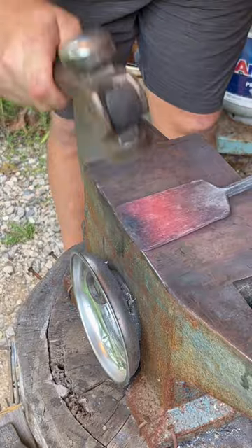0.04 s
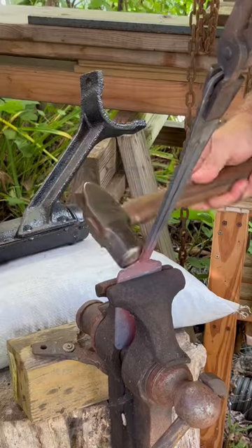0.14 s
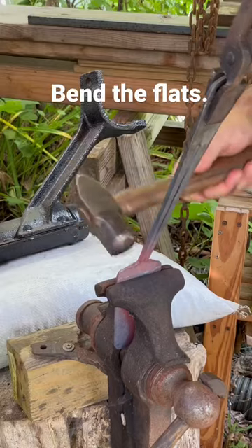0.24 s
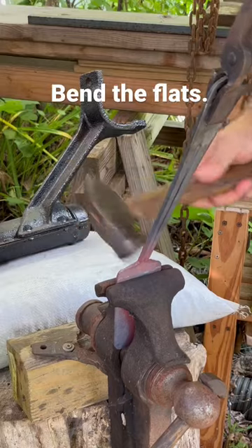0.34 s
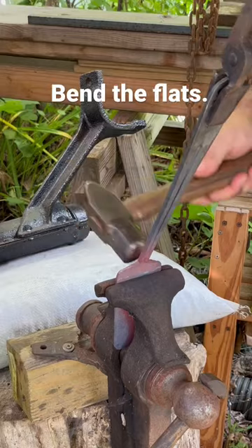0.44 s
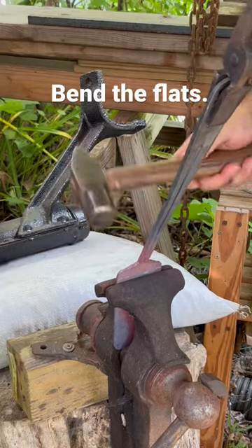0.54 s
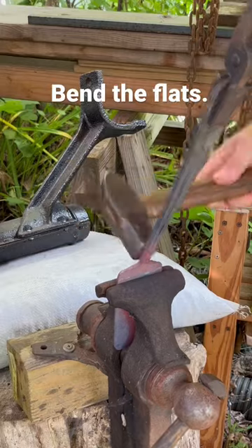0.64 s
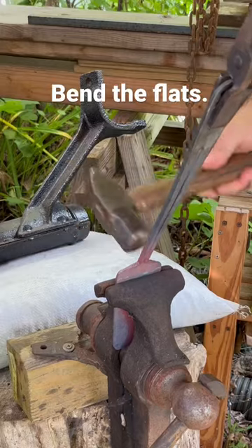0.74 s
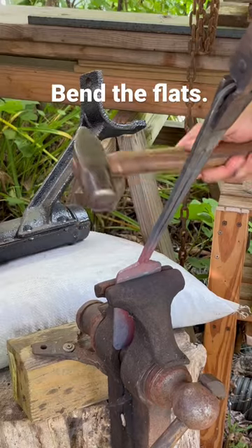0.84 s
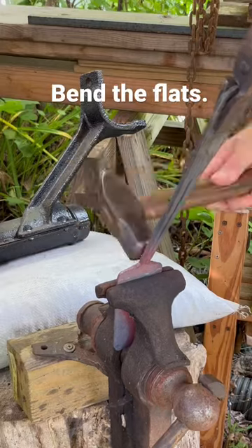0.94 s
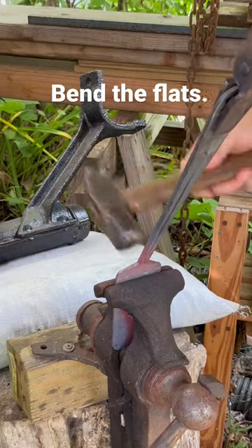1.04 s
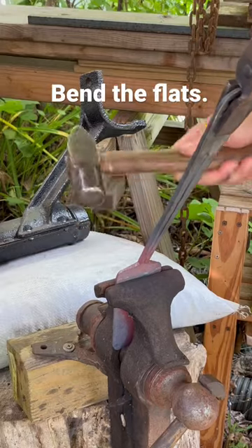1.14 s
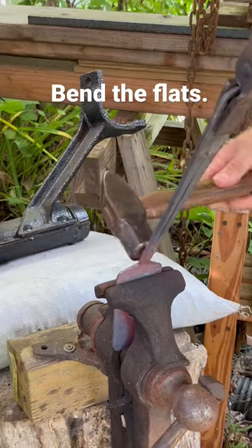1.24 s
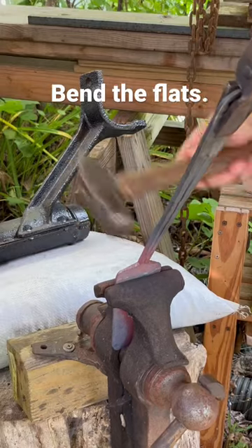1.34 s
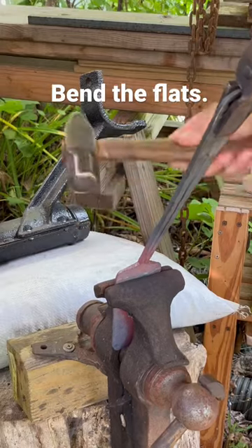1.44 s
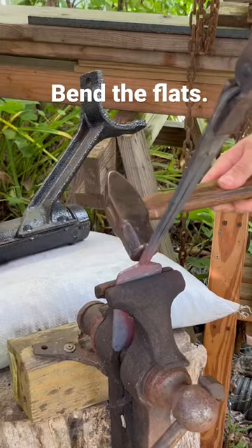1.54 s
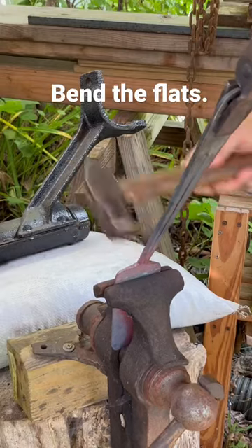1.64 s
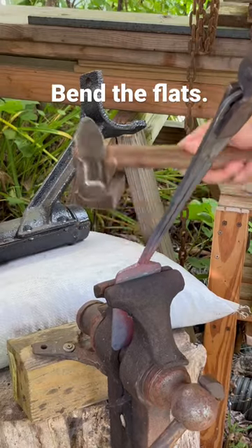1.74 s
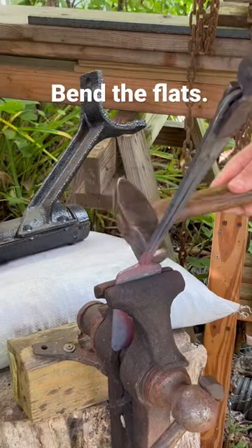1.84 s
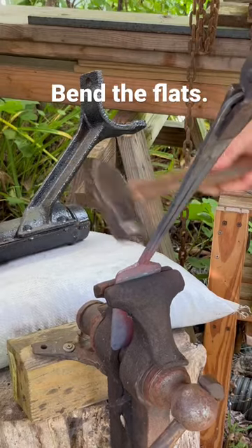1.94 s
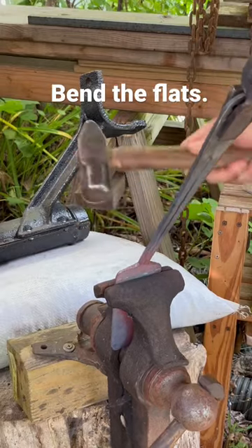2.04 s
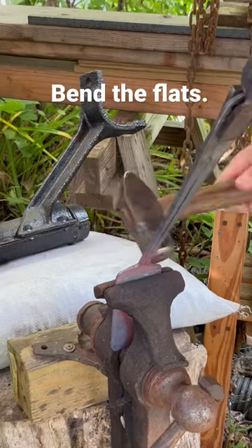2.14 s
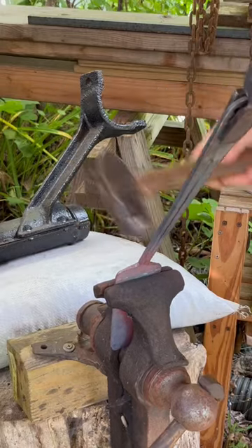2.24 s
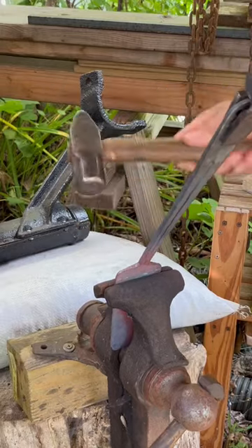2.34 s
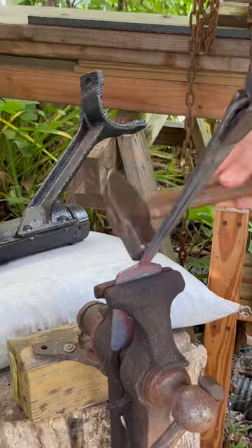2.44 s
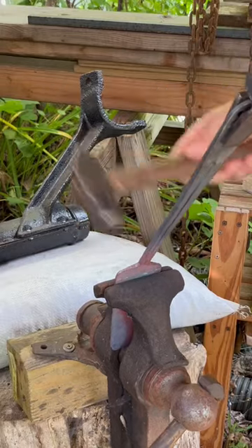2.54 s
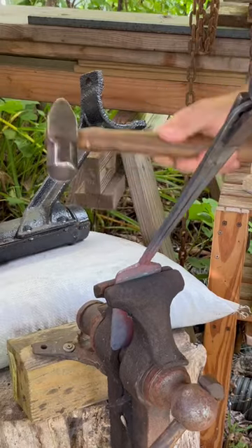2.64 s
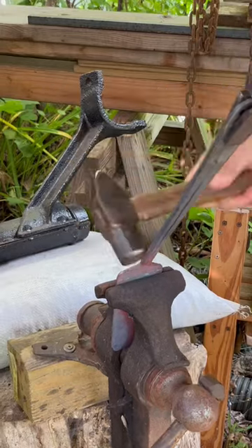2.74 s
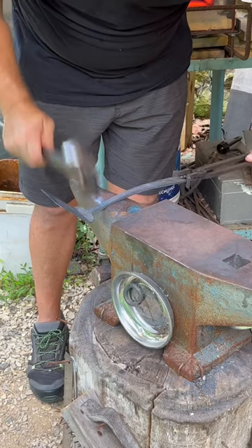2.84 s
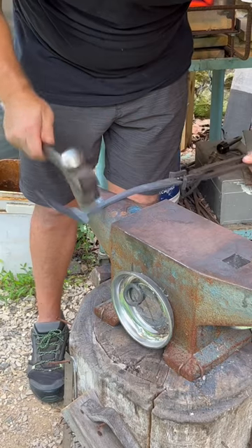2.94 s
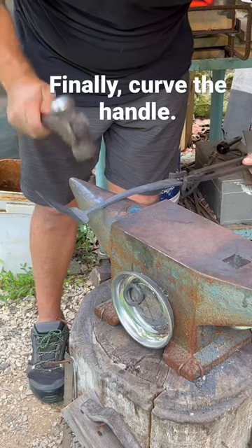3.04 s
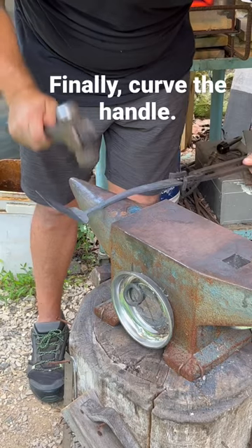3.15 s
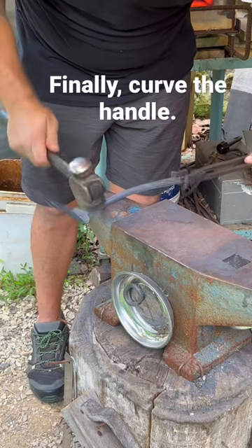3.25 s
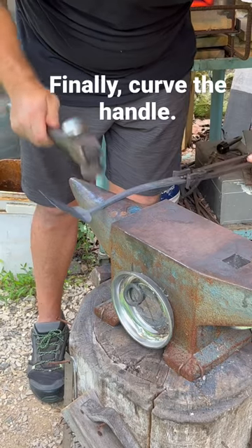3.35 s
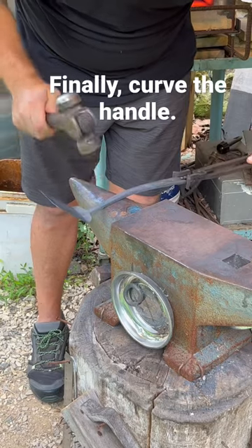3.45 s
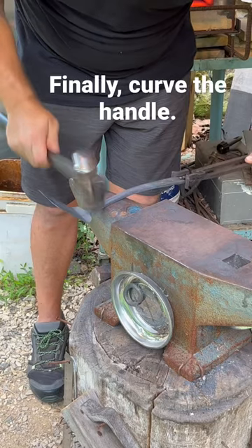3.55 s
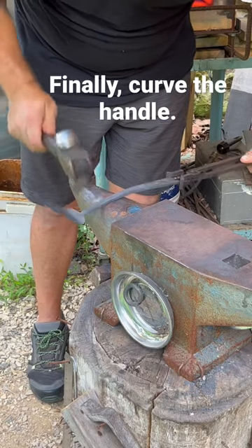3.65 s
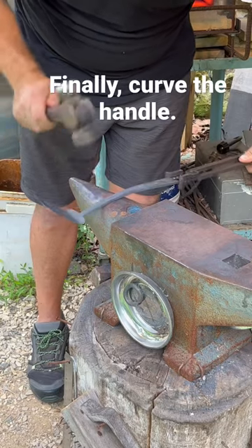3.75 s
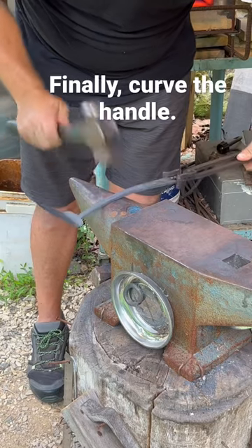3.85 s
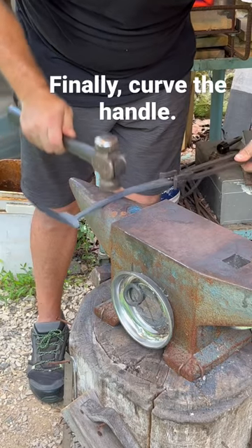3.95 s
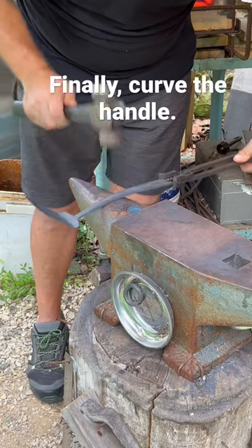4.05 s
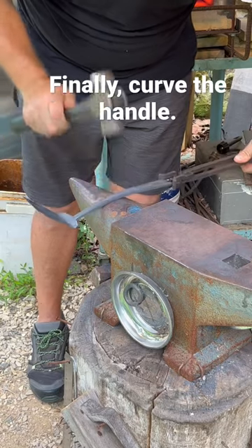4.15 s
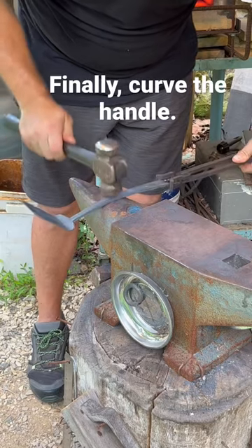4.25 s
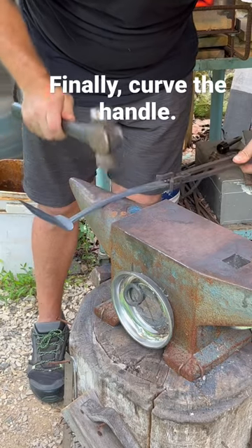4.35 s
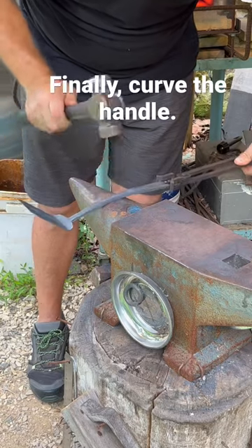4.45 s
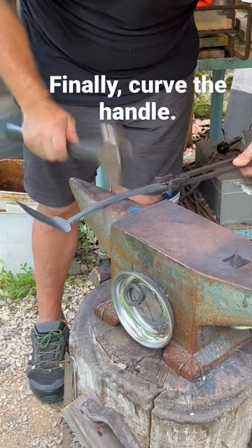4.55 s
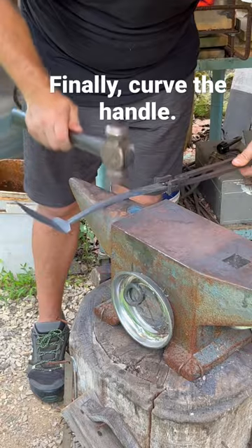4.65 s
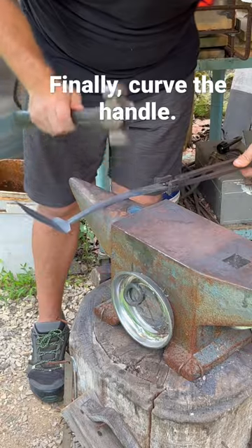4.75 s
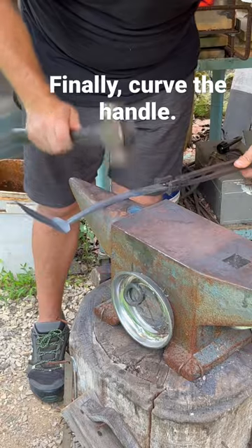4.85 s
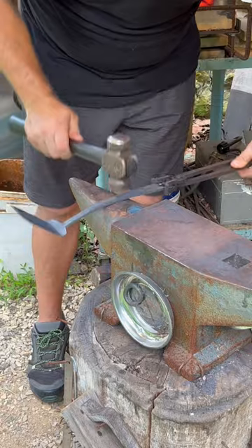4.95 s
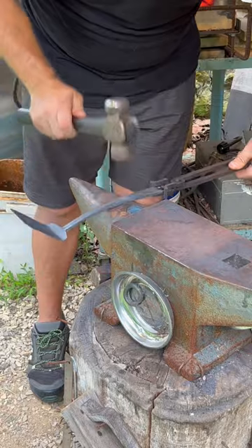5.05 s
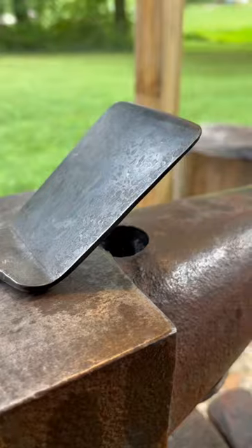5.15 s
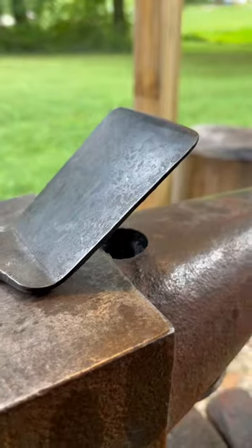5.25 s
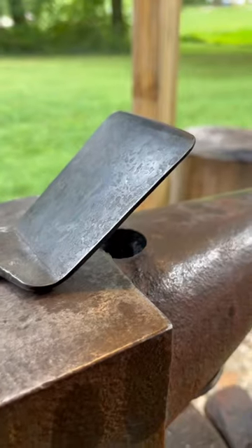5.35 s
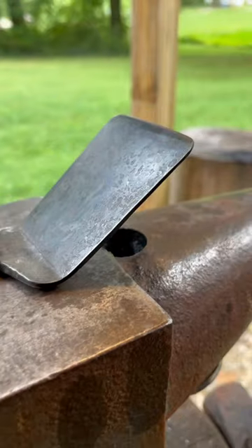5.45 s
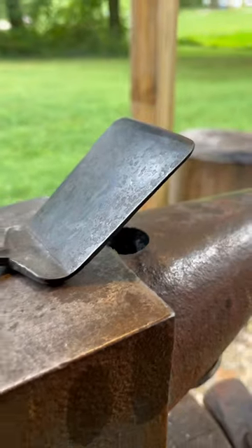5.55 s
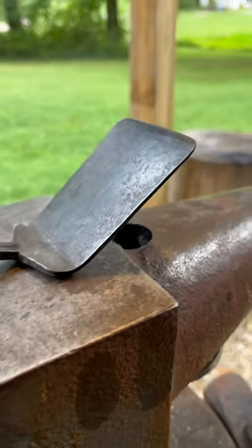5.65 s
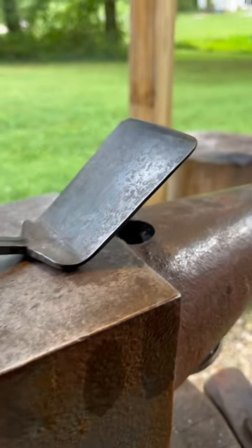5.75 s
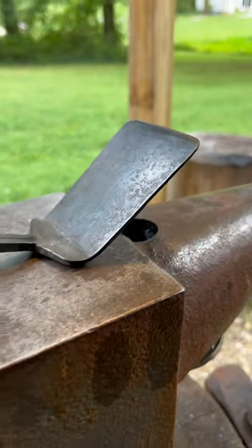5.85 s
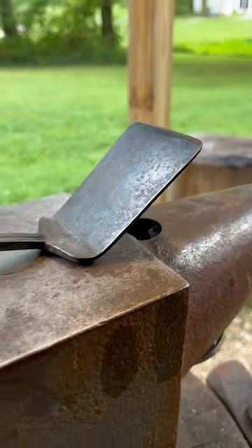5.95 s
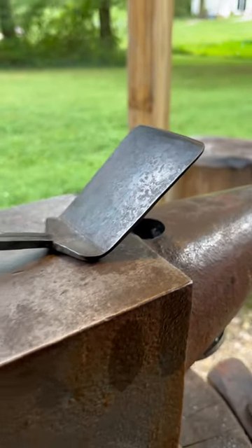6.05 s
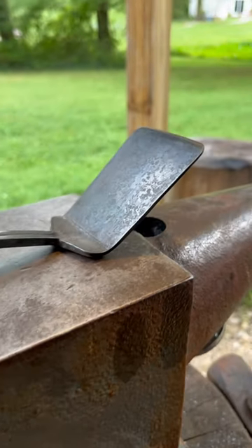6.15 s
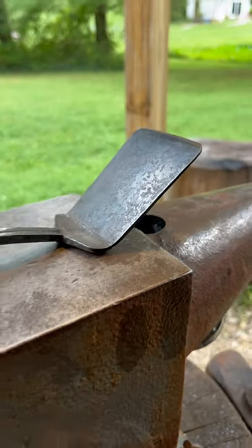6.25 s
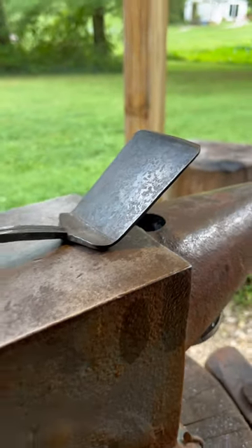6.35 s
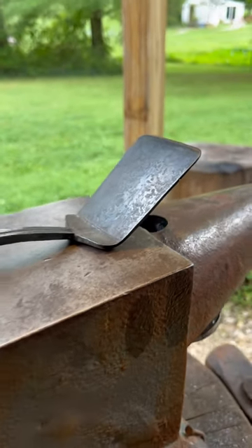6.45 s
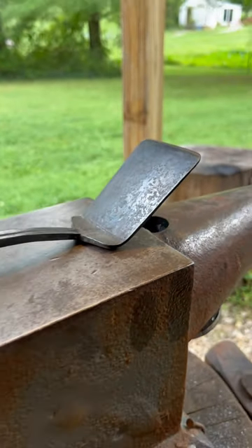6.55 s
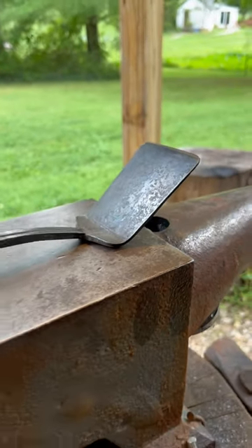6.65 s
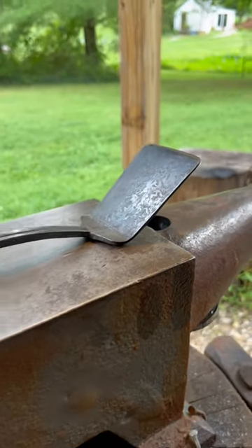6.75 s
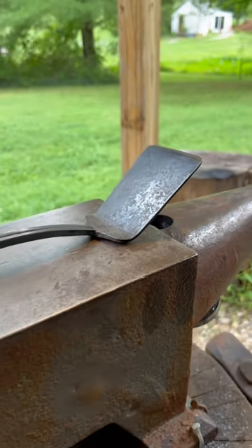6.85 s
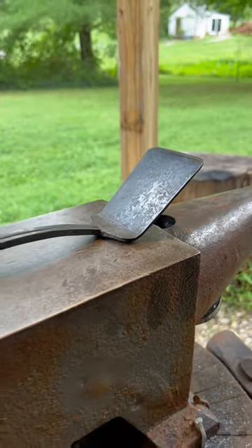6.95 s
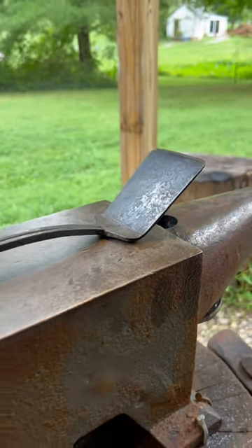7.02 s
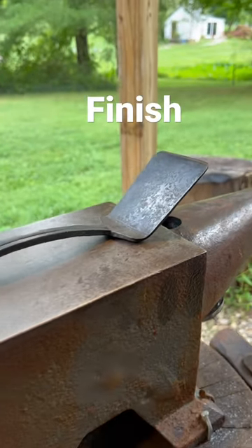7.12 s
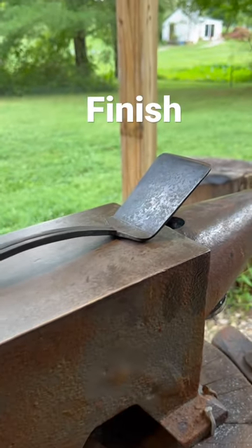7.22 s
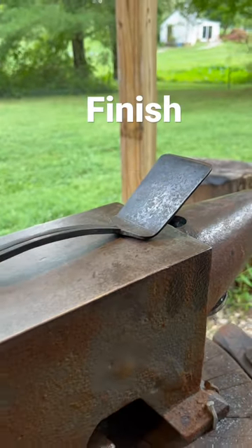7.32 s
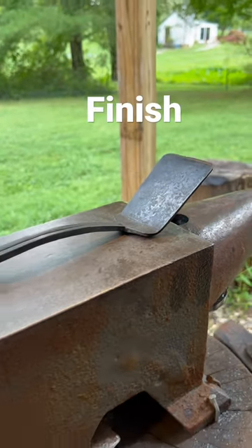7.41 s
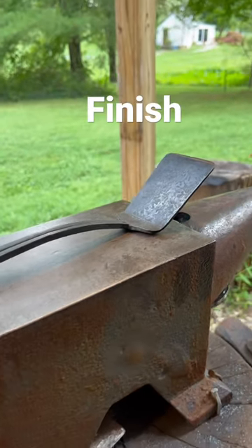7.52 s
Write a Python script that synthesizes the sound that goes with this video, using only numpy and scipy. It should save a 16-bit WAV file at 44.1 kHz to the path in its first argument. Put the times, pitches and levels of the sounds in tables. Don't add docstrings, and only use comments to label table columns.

```python
import sys
import numpy as np
from scipy import signal
from scipy.fft import rfft, irfft, next_fast_len
from scipy.io import wavfile
from scipy.ndimage import uniform_filter1d

SR = 44100
rng = np.random.default_rng(int(sys.argv[2]) if len(sys.argv) > 2 else 0)


def digitize_waveform(pressure):
    field = np.atleast_2d(pressure).T
    bounded = np.clip(field, -1, 1)
    quanta = np.round(bounded * 32767).astype(np.int16)
    wavfile.write(sys.argv[1], SR, quanta)


def voltage_ratio(level):
    return 10 ** (np.asarray(level, float) / 20)


N = 334263

CUTS_S = [
    .0944,
    2.8585,
    5.114,
]

# start_s, crack_db, rattle_under_crack_db,
# thud_under_crack_db, thud_hz
VISE_BLOWS = [(0.0909, -7.5, -19, -20.5, 624), (0.1118, -7, -9, 3.5, 272), (0.3764, -3.5, -15, -2, 290),
              (0.663, -2.5, -25.5, -10.5, 298), (0.9579, -4, -18, -16, 280),
              (1.2414, -8, -18.5, -33.5, 200), (1.5458, -5, -10, -7.5, 275),
              (1.8385, -1, -13.5, -19.5, 620), (2.138, -3.5, -16, -12, 610), (2.4377, -9, -16, -15.5, 525),
              (2.7417, -2.5, -23, -35, 543)]
# start_s, crack_db, rattle_under_crack_db, thud_under_crack_db
HORN_BLOWS = [
    (2.8833, -4, -9.5, -25),
    (3.2256, -7, -10, -27),
    (3.5746, -3, -13, -9.5),
    (3.914, -7, -18.5, -2),
    (4.2446, -5, -8.5, -6),
    (4.585, -2.5, -14.5, -8),
    (4.9156, -2.5, -13, -7),
]
BRIGHT = [0.1, 0.014, 0.96, 0.1, 0.92, 0.3, 0.35, 0.46, 0.1, 0.21, -0.56, 0.118, 0.38, 0.44, 0.1, 0.1,
          -0.75, -0.35]
# mode_hz, level_db, t60_s
VISE_NOTES = [
    [(728.5, -20.5, 0.062), (1380, -18.5, 0.033), (2436, -20, 0.031), (2872, -25.5, 0.033),
     (5020, -26.5, 0.033), (8620, -23, 0.036)],
    [(1468, -16, 0.025), (2450, -17.5, 0.037), (2890, -22.5, 0.038), (3330, -18.5, 0.036),
     (4380, -18, 0.037), (4750, -12.5, 0.031)],
    [(1432, -16, 0.039), (2970, -16, 0.037), (5130, -15, 0.035), (5360, -20.5, 0.029), (9800, -21, 0.036),
     (12490, -16, 0.019)],
    [(2950, -31, 0.064), (4940, -17.5, 0.037), (5340, -13.5, 0.018), (9280, -25.5, 0.03),
     (9780, -26, 0.055), (12410, -34, 0.027)],
    [(663, -30, 0.052), (2235, -22, 0.045), (2976, -29, 0.1), (4700, -20, 0.034), (5050, -19, 0.038),
     (7150, -25, 0.032)],
    [(751, -19.5, 0.082), (1223, -20.5, 0.044), (2220, -16.5, 0.04), (2890, -23.5, 0.07), (4400, -24, 0.07),
     (6756, -21, 0.025)],
    [(610, -20.5, 0.064), (2900, -15, 0.04), (3267, -18.5, 0.038), (4200, -18, 0.044), (5285, -27, 0.033),
     (8520, -28.5, 0.024)],
    [(727, -16, 0.069), (1260, -25, 0.079), (1890, -20.5, 0.04), (2210, -19, 0.04), (2910, -11, 0.029),
     (5200, -24, 0.067)],
    [(2230, -21, 0.0225), (2860, -30, 0.053), (4200, -30.5, 0.07), (4727, -26.5, 0.037), (6240, -28, 0.054),
     (7050, -29, 0.058)],
    [(757.6, -24, 0.061), (1239, -19.5, 0.023), (2265, -21, 0.042), (2920, -12.5, 0.028),
     (4527, -17.5, 0.04), (5095, -22.5, 0.042)],
]
# mode_hz, level_db, t60_s
HORN_NOTES = [
    [(960, -16.5, 0.033), (2095, -17.5, 0.07), (2720, -25.5, 0.058), (3970, -14, 0.047),
     (5090, -26.5, 0.07), (5640, -25, 0.077), (6940, -24, 0.085), (7720, -33, 0.047)],
    [(1634, -16.5, 0.058), (5170, -27, 0.07), (5520, -29, 0.06), (7080, -27, 0.07), (7420, -30.5, 0.0706),
     (8740, -25, 0.07), (11200, -18, 0.07), (13390, -31.5, 0.073)],
    [(390, -2.5, 0.028), (1552, -12.5, 0.039), (3060, -12, 0.037), (3800, -15.5, 0.047),
     (5140, -20.5, 0.031), (8300, -15, 0.037), (8670, -21.5, 0.039), (12260, -24, 0.036)],
    [(376.3, -14, 0.039), (1050, -19, 0.041), (5040, -21.5, 0.07), (8350, -35.5, 0.07), (9420, -25, 0.061),
     (11970, -26, 0.066), (12430, -33.5, 0.07), (13600, -18.5, 0.036)],
    [(421.3, -13, 0.0354), (1030, -39, 0.051), (2380, -21, 0.07), (3320, -19, 0.027), (3776, -23, 0.043),
     (5100, -22.5, 0.038), (5620, -24, 0.066), (9330, -17.5, 0.075)],
    [(398, -12, 0.035), (3044, -25, 0.038), (3390, -19.5, 0.0427), (4520, -25.5, 0.0706),
     (5330, -16.5, 0.023), (8920, -24.5, 0.045), (11600, -20, 0.039), (12260, -25, 0.078)],
    [(394, -7, 0.032), (1090, -20, 0.047), (3700, -17, 0.064), (5580, -18, 0.079), (8340, -24, 0.012),
     (11180, -22, 0.02906), (12620, -21.5, 0.051), (13100, -25.5, 0.067)],
]
# start_s, level_db, t60_s, tilt_db_per_octave, knock_db
VISE_BOUNCES = [(0.417, -11.5, 0.047, 0.5, 1), (0.675, -15, 0.098, 0, -15), (0.9698, -18, 0.094, 3, -23),
                (1.0144, -19, 0.038, -2, 3), (1.2549, -16.5, 0.089, 1, -23), (1.2872, -13.5, 0.041, 3, -23),
                (1.5589, -16.5, 0.19, -9.5, -16), (1.595, -13.5, 0.046, 2.5, 4),
                (1.856, -23, 0.1, 3.5, -17), (1.8696, -20.5, 0.07, 0, 8), (2.1526, -11.5, 0.083, -0.5, -17),
                (2.4509, -17, 0.1, 1, -24), (2.4792, -8.5, 0.036, 6, -8), (2.7548, -13, 0.1, 0.5, -9)]
# start_s, level_db, t60_s, tilt_db_per_octave, knock_db
HORN_BOUNCES = [(2.9165, -13.5, 0.11, 2, -33), (2.9467, -32, 0.041, -2.5, 3),
                (3.2376, -9, 0.0399, 1.5, -12), (3.2432, -13.5, 0.07, 1.5, -7),
                (3.2722, -16.5, 0.094, 0, -17), (3.606, -16.5, 0.094, 1, -18), (3.624, -20, 0.073, 2, -21),
                (3.9271, -10.5, 0.12, -0.5, -22), (3.9425, -16, 0.044, 9.5, -12),
                (3.9692, -26, 0.2, 3, -20), (3.9698, -16, 0.05, 4, -25), (4.0034, -28.5, 0.067, 3, -22),
                (4.017, -23, 0.061, 3, -24), (4.266, -18.5, 0.088, 5, -10), (4.289, -19, 0.051, -2.5, -15),
                (4.6121, -9, 0.056, -0.5, -16), (4.935, -19, 0.036, -22.5, -14)]
# start_s, mode_hz, level_db, t60_s
PINGS = [(.1116, 8656, -20, 0.042), (.1122, 12230, -27, .03), (.3762, 9345, -19, .03),
         (.4165, 4900, -26, 0.037), (.9585, 11280, -27, 0.027), (.9585, 12500, -23, 0.018),
         (.959, 3385, -20, .03), (.9755, 3210, -17, 0.032), (1.2868, 4952, -23.5, 0.036),
         (1.84, 7450, -20, 0.022), (1.8412, 803, -12.5, 0.018), (1.8544, 1877, -23.5, 0.02),
         (1.886, 750, -27, 0.066), (2.1395, 801, -13.5, 0.025), (2.1505, 4270, -19, 0.033),
         (2.168, 646, -20.5, 0.07), (2.4605, 4306, -27, .03), (2.7415, 8225, -19, 0.044),
         (2.8955, 5512, -29, .03), (2.9155, 11412, -25, 0.032), (2.9173, 8656, -23.5, 0.032),
         (2.945, 4700, -30, .04), (3.2257, 8750, -17, 0.027), (3.226, 3875, -22, 0.026),
         (3.237, 6589, -19, .03), (3.241, 8311, -25, .03), (3.2715, 12747, -29, .03),
         (3.2725, 8570, -26, 0.032), (3.606, 8770, -26, .03), (3.9146, 12360, -21, 0.022),
         (3.9146, 5280, -18.5, 0.038), (3.9217, 8640, -26.5, .03), (3.942, 4200, -25.5, .05),
         (3.9705, 4460, -35, .04), (4.004, 4070, -29.5, .05), (4.017, 4300, -37, .06),
         (4.2455, 11369, -23, 0.033), (4.585, 3900, -20, .03), (4.602, 7579, -35, .03),
         (4.608, 11843, -25, .03), (4.919, 570, -21.5, .05), (3.93, 15900, -31, .3),
         (4.25, 15600, -30, .15)]
# mode_hz, under_crack_db, t60_s
VISE_PING = (6520, -10.5, 0.056)

# freq_hz, level_db_per_hz
VISE_COLOUR = [(100, -19.5), (300, -4), (600, -0.5), (1200, -7), (2000, -5.5), (3000, -4.5), (4500, -8.5),
               (6500, -9), (9000, -18), (12000, -17), (15500, -31)]
# freq_hz, level_db_per_hz
HORN_COLOUR = [(100, -4), (300, -7), (600, -17), (1200, -13), (1700, -10), (3000, -11.5), (4500, -12.5),
               (6500, -11), (9000, -17.5), (12000, -16), (15500, -24)]
# freq_hz, level_db_per_hz
STAND_COLOUR = [(60, -19.5), (150, -12), (320, -14), (600, -6), (1000, -23), (1600, -36.5), (5000, -70)]
# freq_hz, level_db_per_hz
BOOT_COLOUR = [(120, -24.5), (250, -5), (390, 5.5), (520, -20), (2000, -39)]
# freq_hz, level_db_per_hz
FIRST_COLOUR = [(40, 4.5), (150, 5), (300, -1.5), (600, -21.5), (1000, -15), (1500, -33), (2250, -29),
                (4000, -38.5), (9000, -42), (15000, -62.5)]
# freq_hz, level_db_per_hz
ROAR_COLOUR = [(30, -15), (60, -8), (110, -5.5), (200, -14.5), (400, -22.5), (700, -24.5), (1100, -30),
               (2000, -30.5), (3000, -37), (5000, -43), (8000, -47.5), (11000, -52.5), (14000, -59.5),
               (16000, -70.5)]
# freq_hz, level_db_per_hz
YARD_COLOUR = [(30, -11.5), (60, -5), (110, 1), (200, -3), (400, -19), (700, -16), (1100, -19.5),
               (2000, -22), (3000, -26), (5000, -30), (8000, -26), (11000, -36.5), (14000, -46),
               (16000, -61.5)]
# freq_hz, level_db_per_hz
LAWN_COLOUR = [(30, -2.5), (60, 6), (100, 5), (200, -13), (500, -17), (1000, -17), (2000, -29.5),
               (3000, -42), (4500, -30.5), (6000, -17.5), (7000, -18), (9500, -30.5), (12000, -42.5),
               (14500, -49)]

# mode_hz, under_crack_db, t60_s
BLADE = [(730, 1.3, 0.038), (1333, 6, 0.026), (2370, 2.7, 0.15), (3926, 7.2, 0.015)]
# mode_hz, width_hz, level_db
LEFTOVER = [(2250, 160, -56.5), (1038, 105, -43.5)]
# mode_hz, under_crack_db, t60_s
BAR = [(1016, -8.5, 0.039), (3240, -17, 0.068), (5094, -17.5, 0.08), (8270, -19.5, 0.0513)]
# mode_hz, level_db, t60_s
ANVIL = [(1950, -17.5, 0.15), (3330, -19.5, .18), (3360, -18.5, 0.25), (4000, -26, 0.27), (4540, -17, 0.18),
         (5560, -9.5, 0.12), (8330, -18, 0.14), (10620, -1.5, 0.12)]
# mode_hz, level_db, t60_s
STUMP = [(660, -8.5, 0.088)]
# mode_hz, under_crack_db, t60_s
GROUND = [(53.6, -17.5, 0.58), (115, -12.5, 0.1223)]
# ring_level_db, fed_by_bar_s, free_t60_s, choked_after_s, overtones_under_crack_db
RINGS = [
    (-25, 0.0061, 0.37, .4, -8.5),
    (-37, 0.073, 0.64, 0.088, -11),
    (-27, 0.038, 0.37, .4, -29),
    (-25.5, 0.072, 0.225, 0.11, -7),
    (-19.5, 0.0073, .33, .4, -3.5),
    (-16.5, 0.0067, 0.29, .4, -6),
    (-26.5, 0.024, 0.5, .4, -16.5),
]
# start_s, level_db
SCUFFS = [
    (3.028, -30.5),
    (4.97, -31),
]
# freq_hz, t60_s
SHED = [(200, 0.25), (1000, 0.19), (4000, 0.6), (12000, 0.32)]

# mode_hz, width_hz, level_db
CHAMBER = [(57.9, 8.2, -5.5), (82.4, 12, -9), (144.1, 3.3, -5), (172, 6.2, -8), (221, 2.7, -13.5),
           (291.7, 12.3, -17.5), (363.3, 35, -14), (426, 10, -19), (1060, 60, -21)]
# mode_hz, width_hz, level_db
FAR_CHAMBER = [(59.6, 14, -0.5), (113.2, 51, -11), (342.7, 45, -12.5)]
# centre_s, level_db, half_length_s
SURGES = [(0.124, -24, 0.093), (0.27, -20.5, 0.063), (0.444, -22, 0.056), (0.635, -20, 0.13),
          (0.925, -24, 0.087), (1.047, -26, 0.074), (1.192, -23.5, 0.1), (1.428, -33, 0.088),
          (1.526, -23, 0.091), (1.77, -25, 0.12), (1.987, -28, 0.043), (2.112, -29, 0.069),
          (2.32, -26.5, 0.059), (2.48, -28.5, 0.023), (2.646, -24.5, 0.04), (2.773, -29.5, 0.078)]

# wing_hz, width_hz, level_db
NEAR_SONG = [(8400, 430, -4.5), (6540, 770, -10)]
# wing_hz, width_hz, level_db
LAWN_SONG = [(8020, 430, 4), (6570, 980, 1), (8600, 200, -7.5), (8690, 180, -7.5), (4516, 660, -11.5)]
# wing_hz, width_hz, level_db
HIGH_SONG = [(12200, 3600, 0)]
SONG_DB = [-79, -66, -57]

# freq_hz, lead_rad
LEAD = [(0, 0), (430, -.3), (800, -.3), (1100, 0), (1550, -.4), (2000, .6), (2550, 2.2), (3800, .95),
        (5100, 1.45), (5950, 3.15), (8100, 6.35), (10330, 9.45), (12400, 12.55), (14650, 15.7),
        (15900, 18.8), (17000, 20)]
# freq_hz, gain_db
TILT = [(60, -.8), (200, -2.6), (500, -6.3), (800, -4.6), (1100, -2), (1800, .7), (3000, .1), (15000, .5)]
# freq_hz, likeness_0_to_1
ALIKE = [(200, .9997), (450, .98), (800, .8), (1400, .86), (2000, .96), (4500, .96), (5500, .994),
         (15000, .996)]
# freq_hz, likeness_0_to_1
FORGE_ALIKE = [(170, 1), (260, .9), (430, .3), (650, .65), (1000, .45), (1300, .7), (1800, .9), (5400, 1)]
# freq_hz, likeness_0_to_1
LAWN_ALIKE = [(170, .97), (500, .25), (1000, .55), (2000, .65), (2700, .8), (3500, .2), (5000, .25),
              (5700, .99)]
# freq_hz, lead_rad
LAWN_LEAD = [(430, 0), (800, 1.2), (1600, .5), (2200, .5), (3100, 1.4), (3800, -.2), (4700, 1), (5900, 0)]
# freq_hz, gain_db
LAWN_TILT = [(150, 0), (300, 1.5), (600, 4), (1100, 4), (1600, 0)]

FIRST_DB, LAWN_DB, FAR_DB = -23.5, -50.5, -41
VISE_RATTLE_T60_S, HORN_RATTLE_T60_S = 0.12, 0.17
RATTLE_PER_FED = 0.54
TAIL_EDGE_HZ = 12000
BOOM_SHARE = 0.27
RING_HZ, SECOND_HZ = 2228, 2767
SECOND_DB, SECOND_T60_S, SECOND_STIFLED_S = -31.5, .46, .165
CHOKE_DB_PER_S = 216.5
LINGER_DB, LINGER_T60_S = -30, 1
NOTE_HZ, WAVER_HZ, IDLE_DB = 108.3, 2.51, -48
LOW_DB, HISS_DB, DYING_DB_PER_S = -23.5, -26, 0.2
LOW_SHARE, HISS_SHARE = 0.18, 0.038
DUCK_DB, DUCK_S = 4.5, 0.35
AT_CUT_DB, SETTLE_S = -4, 0.022
THROB_HZ = 37.8
HIGH_DB, JOINS_S, JOINING_S = -79, 6.3, 0.22
CEILING = .8
EDGE_HZ, EDGE_DB, LOW_CUT_HZ = 16200, -40, 50.6


def evened(x):
    return x / np.sqrt(np.mean(x ** 2) + 1e-20)


def read(points, hz):
    f, value = np.transpose(points)
    return np.interp(np.log(hz + 1), np.log(f + 1), value)


def add(mix, start_s, sound):
    part = mix[round(start_s * SR):][:len(sound)]
    part += sound[:len(part)]


def smoothed(x, size):
    return uniform_filter1d(uniform_filter1d(x, size=size), size=size)


def hiss(points, patchy_db):
    frames, hz = N // 512 + 5, np.fft.rfftfreq(2048, 1 / SR)
    a, b, patches = rng.standard_normal((frames, 1025, 3)).T
    patches = uniform_filter1d(patches, size=20, axis=0)
    patches = evened(uniform_filter1d(patches, size=6, axis=1))
    z = (a + 1j * b) * voltage_ratio(read(points, hz)[:, None] + patchy_db * patches)
    return evened(signal.istft(z, nperseg=2048, noverlap=1536)[1][:N])


def resonate(x, hz, width_hz):
    b, a = signal.iirpeak(hz, hz / width_hz, SR)
    return signal.lfilter(b, a, signal.lfilter(b, a, x))


def chamber(modes):
    return sum(voltage_ratio(db) * evened(resonate(rng.standard_normal(N), hz, width_hz)) for hz, width_hz, db in modes)


def coloured(x, points, tilt_db, lumps_db):
    hz = np.fft.rfftfreq(2048, 1 / SR)
    lumps = np.tanh(evened(uniform_filter1d(rng.standard_normal(len(hz)), size=12)))
    level_db = read(points, hz) + tilt_db * np.log2((hz + 50) / 4000) + lumps_db * lumps
    log = np.log(voltage_ratio(level_db))
    log = np.r_[log, log[-2:0:-1]]
    body = np.fft.ifft(np.exp(log - 1j * signal.hilbert(log).imag)).real
    return signal.fftconvolve(x, body / np.linalg.norm(body))[:len(x)]


def burst(t60_s, rise_s):
    t = np.arange(SR // 2) / SR
    return rng.standard_normal(len(t)) * voltage_ratio(-60 * t / max(t60_s, .004)) * (1 - np.exp(-t / rise_s))


def chatter(length_s):
    t = np.arange(SR // 2) / SR
    touches = uniform_filter1d(rng.exponential(1, len(t)) ** 2, size=40)
    held = np.exp(-(t / max(length_s, .005)) ** 2) * (1 - np.exp(-t / 0.012))
    return rng.standard_normal(len(t)) * evened(touches) * held


def dulled(x):
    return signal.lfilter(*signal.butter(8, TAIL_EDGE_HZ, fs=SR), x)


def ringing(hz, db, t60_s, rise_s):
    t = np.arange(SR // 2) / SR
    level = voltage_ratio(db - 60 * t / max(t60_s, .01)) * (1 - np.exp(-t / rise_s))
    return level * np.sin(2 * np.pi * (hz * t + rng.random()))


def blow(rattle_db, t60_s, points, crack_t60_s, bright_db, thin_db):
    tick = voltage_ratio(4.5) * coloured(burst(0.011, 0.0002), points, 2.5 + bright_db, lumps_db=2.0)
    crack = voltage_ratio(-1.0) * coloured(burst(crack_t60_s, 0.00033), points, 0.7 + bright_db, lumps_db=-3.0)
    rattle = voltage_ratio(-2.5) * coloured(burst(1.284 * t60_s, 0.014), points, thin_db + bright_db, lumps_db=2.0)
    touches = voltage_ratio(2.0) * coloured(chatter(0.18 * t60_s), points, -0.9 + bright_db, lumps_db=2.5)
    return tick + crack + voltage_ratio(rattle_db) * dulled(touches + rattle)


def vise_blow(crack_db, rattle_db, thud_db, thud_hz, bright_db):
    thud = ringing(thud_hz, thud_db, 0.065, rise_s=0.00622)
    strike = blow(rattle_db, VISE_RATTLE_T60_S, VISE_COLOUR, crack_t60_s=0.022, bright_db=bright_db,
                  thin_db=-1.5)
    return voltage_ratio(crack_db - 3.0) * (strike + thud)


def by_the_anvil():
    out = voltage_ratio(FIRST_DB) * hiss(FIRST_COLOUR, patchy_db=-4.0) + chamber(LEFTOVER)
    start_s, crack_db, *rest = VISE_BLOWS[0]
    add(out, start_s, vise_blow(crack_db, *rest, BRIGHT[0]))
    add(out, start_s, voltage_ratio(crack_db - 1.0) * sum(ringing(*mode, rise_s=0.00037) for mode in BLADE))
    return out


def ducking(blows):
    kicks = np.zeros(N)
    kicks[(np.array(blows)[:, 0] * SR).astype(int)] = DUCK_DB
    return voltage_ratio(-signal.lfilter([1], [1, -np.exp(-1 / (DUCK_S * SR))], kicks))


def surging():
    t = np.arange(0, N, 64) / SR
    gain = voltage_ratio(IDLE_DB) + sum(voltage_ratio(db) * np.exp(-((t - s) / half_s) ** 2) for s, db, half_s in SURGES)
    return np.interp(np.arange(N) / SR, t, 20 * np.log10(gain))


def settling(cut_s):
    since_s = np.maximum(np.arange(N) / SR - cut_s, 0)
    return 1 - (1 - voltage_ratio(AT_CUT_DB)) * np.exp(-(since_s / SETTLE_S) ** 2)


def forge():
    waver = evened(smoothed(rng.standard_normal(N), 1500))
    note = np.sqrt(2) * np.sin(2 * np.pi * np.cumsum(NOTE_HZ + WAVER_HZ * waver) / SR)
    note_db = surging()
    swell_db = note_db + 27
    dying_db = -DYING_DB_PER_S * np.arange(N) / SR
    low = voltage_ratio(LOW_DB + LOW_SHARE * swell_db) * chamber(CHAMBER)
    burner_hiss = settling(CUTS_S[0]) * hiss(ROAR_COLOUR, patchy_db=1.3)
    burner = low + voltage_ratio(HISS_DB + HISS_SHARE * swell_db) * burner_hiss
    return voltage_ratio(note_db) * note + voltage_ratio(dying_db) * ducking(VISE_BLOWS[1:]) * burner


def insects(wings):
    t = np.arange(N) / SR
    song = 0
    for hz, width_hz, db in wings:
        throbs = rng.uniform([.85, 0], [1.15, 1], (3, 2))
        throb = sum(np.cos(2 * np.pi * (THROB_HZ * ratio * t + phase)) for ratio, phase in throbs)
        rasp = rng.standard_normal(N) * voltage_ratio(1.5 * throb)
        song = song + voltage_ratio(db) * evened(resonate(rasp, hz, width_hz))
    return evened(song)


def shed(x):
    taps = np.zeros(SR // 2)
    at = np.arange(300, len(taps) - 20, 20)
    taps[at + rng.integers(0, 20, len(at))] = rng.choice([-1., 1.], len(at))
    hz, t, z = signal.stft(taps, SR, nperseg=256)
    tail = signal.istft(z * voltage_ratio(-60 * t / read(SHED, hz)[:, None]), SR, nperseg=256)[1]
    return signal.fftconvolve(x, tail / np.linalg.norm(tail))[:N]


def add_bounces(mix, bounces, points):
    for start_s, db, t60_s, bright_db, knock_db in bounces:
        touch = voltage_ratio(-3.0) * chatter(0.27 * t60_s) + voltage_ratio(-1.0) * burst(t60_s, 0.000487)
        touch += voltage_ratio(7.0) * burst(0.0093, 0.000199)
        touch = dulled(coloured(touch, points, bright_db, lumps_db=3.5))
        knock = np.roll(ringing(770, knock_db, 0.046, rise_s=0.0012), 130)
        add(mix, start_s, voltage_ratio(db - 7.0) * (touch + knock))


def vise_work():
    out = np.zeros(N)
    for (start_s, *row), notes, bright_db in zip(VISE_BLOWS[1:], VISE_NOTES, BRIGHT[1:]):
        add(out, start_s, vise_blow(*row, bright_db))
        add(out, start_s, voltage_ratio(1.5) * sum(ringing(*note, rise_s=0.00017) for note in notes))
    add_bounces(out, VISE_BOUNCES, VISE_COLOUR)
    return out + voltage_ratio(-45.5) * shed(out)


def pings():
    out = np.zeros(N)
    hz, under_db, t60_s = VISE_PING
    vise_pings = [(start_s, hz, db + under_db, t60_s) for start_s, db, *_ in VISE_BLOWS[1:]]
    for start_s, *mode in PINGS + vise_pings:
        add(out, start_s, ringing(*mode, rise_s=0.00021))
    return out


def far_forge():
    return voltage_ratio(FAR_DB) * chamber(FAR_CHAMBER) + voltage_ratio(-50.0) * hiss(YARD_COLOUR, patchy_db=-1.0)


def stump_thud(thud_db):
    thud = voltage_ratio(thud_db - 2.5) * coloured(burst(0.14, 0.0013), STAND_COLOUR, tilt_db=3.5, lumps_db=-1.0)
    thud += sum(ringing(hz, thud_db + db, t60_s, rise_s=0.00071) for hz, db, t60_s in STUMP)
    return thud + voltage_ratio(BOOM_SHARE * thud_db) * sum(ringing(*mode, rise_s=0.043) for mode in GROUND)


def overtones(overtones_db):
    ring = sum(ringing(hz, overtones_db + db + 0.796 * rng.standard_normal(), t60_s, rise_s=0.0021)
               for hz, db, t60_s in ANVIL)
    return ring + sum(ringing(hz, db + 1.7 * rng.standard_normal(), t60_s, rise_s=0.00022)
                      for hz, db, t60_s in BAR)


def anvil_ring():
    out, starts = np.zeros(N), [row[0] for row in HORN_BLOWS]
    for start_s, end_s, (db, fed_s, t60_s, choked_s, over_db) in zip(starts, starts[1:] + CUTS_S[2:], RINGS):
        t = np.arange(0, end_s - start_s, 1 / SR)
        free_s = np.maximum(t - fed_s, 0)
        choke_db = CHOKE_DB_PER_S * np.maximum(t - choked_s, 0)
        level = voltage_ratio(db) * (voltage_ratio(-60 / t60_s * free_s - choke_db) + voltage_ratio(LINGER_DB - 60 * t / LINGER_T60_S))
        tone = level * np.sin(2 * np.pi * (RING_HZ * t + rng.random()))
        stifle_db = 2 * CHOKE_DB_PER_S * np.maximum(t - SECOND_STIFLED_S, 0)
        second_db = SECOND_DB + over_db - 60 / SECOND_T60_S * t - stifle_db
        second = voltage_ratio(second_db) * np.sin(2 * np.pi * SECOND_HZ * t)
        add(out, start_s, np.sqrt(2) * (tone + second) * (1 - np.exp(-t / 0.0004)))
    return out


def horn_work():
    out = np.zeros(N)
    bright = BRIGHT[len(VISE_BLOWS):]
    for row, (_, fed_s, *_, overtones_db), notes, bright_db in zip(HORN_BLOWS, RINGS, HORN_NOTES, bright):
        start_s, crack_db, rattle_db, thud_db = row
        strike = blow(rattle_db, HORN_RATTLE_T60_S + RATTLE_PER_FED * fed_s, HORN_COLOUR,
                      crack_t60_s=0.02656, bright_db=bright_db, thin_db=-1.06)
        add(out, start_s, voltage_ratio(crack_db - 4.5) * (strike + overtones(overtones_db) + stump_thud(thud_db)))
        add(out, start_s, sum(ringing(*note, rise_s=.0003 + .6 / note[0]) for note in notes))
    add_bounces(out, HORN_BOUNCES, HORN_COLOUR)
    for start_s, db in SCUFFS:
        scuff = coloured(burst(0.45, 0.19), BOOT_COLOUR, tilt_db=-2.5, lumps_db=-19.0)
        add(out, start_s, voltage_ratio(db) * scuff)
    return out + voltage_ratio(-22.0) * shed(out) + anvil_ring()


def lawn():
    return voltage_ratio(LAWN_DB) * hiss(LAWN_COLOUR, patchy_db=2.0) + voltage_ratio(SONG_DB[2]) * insects(LAWN_SONG)


def high_insects():
    return voltage_ratio(HIGH_DB) * insects(HIGH_SONG) / (1 + np.exp((JOINS_S - np.arange(N) / SR) / JOINING_S))


def spread(make, alike, lead=((1, 0), (2, 0)), tilt=((1, 0), (2, 0))):
    right, other, hz = make(), make(), np.fft.rfftfreq(N, 1 / SR)
    same = read(alike, hz)
    left = same * np.exp(1j * read(lead, hz)) * rfft(right) + np.sqrt(1 - same ** 2) * rfft(other)
    return np.array([irfft(left * voltage_ratio(read(tilt, hz)), N), right])


def ports(places):
    size = next_fast_len(N + 4096)
    hz = np.fft.rfftfreq(size, 1 / SR)
    scatter = rfft(rng.standard_normal(4000) * voltage_ratio(-48 * np.arange(4000) / 4000), size)
    scatter /= np.sqrt(uniform_filter1d(abs(scatter) ** 2, size=600))
    alike = np.clip(read(ALIKE, hz), 0, 1)
    lead_rad = np.interp(hz, *np.transpose(LEAD))
    lead_rad -= .2 * np.sin(2 * lead_rad) * (hz > 5100)
    port = alike * np.exp(1j * lead_rad) + np.sqrt(1 - alike ** 2) * scatter
    early_s = np.maximum(-np.fft.fftfreq(size, SR / size), 0)
    prompt = rfft(irfft(port, size) * np.exp(-(early_s / .001) ** 2))
    port += (prompt - port) / (1 + (1500 / (hz + 1)) ** 4)
    edge = voltage_ratio(EDGE_DB / (1 + (EDGE_HZ / (hz + 1)) ** 60))
    edge /= np.sqrt(1 + (LOW_CUT_HZ / (hz + 1)) ** 4)
    pair = np.array([port * voltage_ratio(read(TILT, hz)), np.ones(len(hz))]) * edge
    return [irfft(rfft(CEILING * np.tanh(x / CEILING), size) * pair, size)[:, :N] for x in places]


def scene():
    near = insects(NEAR_SONG)
    by_vise = spread(forge, FORGE_ALIKE) + voltage_ratio(SONG_DB[0]) * near + vise_work()
    horn_air = spread(far_forge, FORGE_ALIKE) + voltage_ratio(SONG_DB[1]) * near
    by_horn = settling(CUTS_S[1]) * horn_air + horn_work()
    by_lawn = spread(lawn, LAWN_ALIKE, LAWN_LEAD, LAWN_TILT) + high_insects()
    places = [by_the_anvil(), by_vise, by_horn, by_lawn]
    place = np.searchsorted(np.array(CUTS_S) * SR, np.arange(N))
    flashes = pings()
    heard = ports([sound + (place == k) * flashes for k, sound in enumerate(places)])
    return sum(smoothed(1. * (place == k), 40) * sound for k, sound in enumerate(heard))


def roll_off(x):
    return signal.sosfilt(signal.butter(12, 16850, fs=SR, output="sos"), x)


def record(dry):
    return roll_off(dry)


dry = scene()
out = record(dry)
digitize_waveform(out)
```